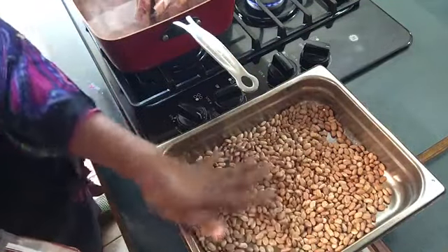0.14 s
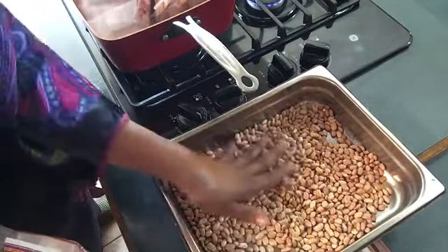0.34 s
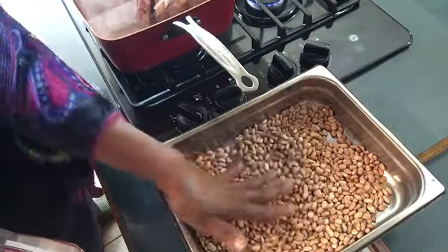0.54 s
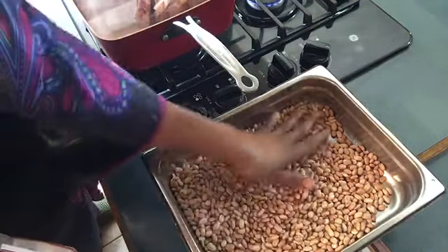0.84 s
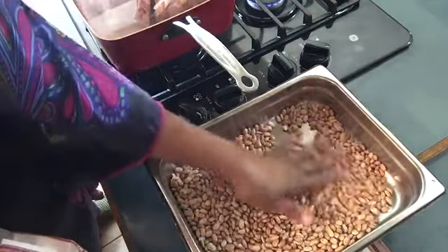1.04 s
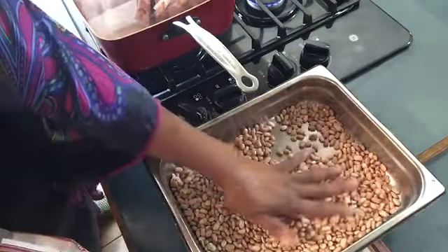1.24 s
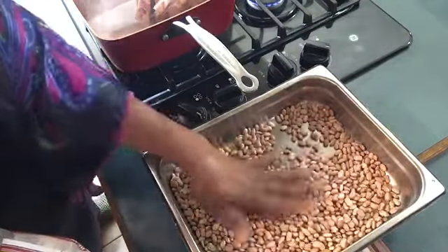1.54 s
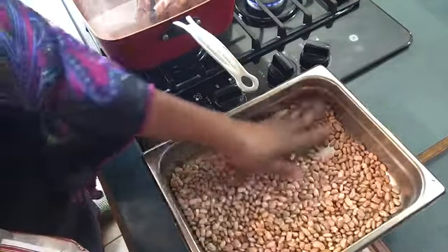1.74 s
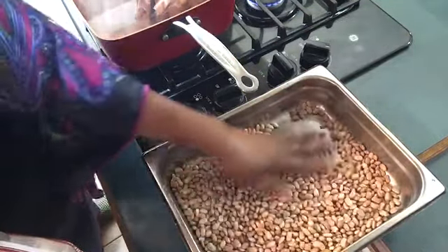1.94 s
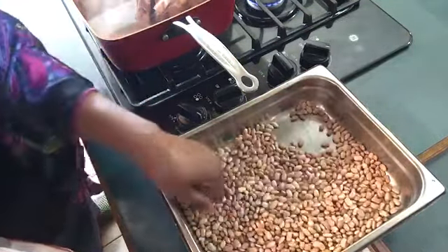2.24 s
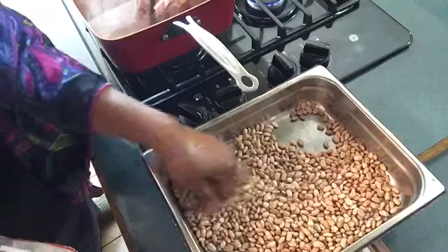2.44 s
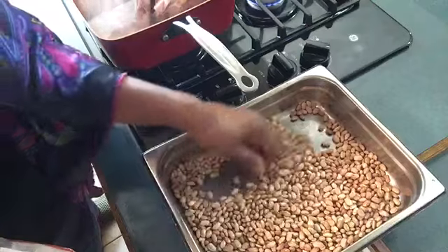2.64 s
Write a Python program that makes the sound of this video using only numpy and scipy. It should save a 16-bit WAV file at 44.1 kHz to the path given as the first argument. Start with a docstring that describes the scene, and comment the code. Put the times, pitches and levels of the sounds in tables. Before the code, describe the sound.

A hand stirs dry beans in a metal pan, clattering in four sweeps with soft thuds

```python
"""Over a faint kitchen background, a stir of dry beans in a steel pan dies away at the start.
Then a hand sweeps through them four times, landing with soft thuds, two of them in the last sweep.
The beans, random clicks, knock on the pan and tick on each other; single beans snap out throughout.
The clicks and the hand's pushes ring the pan's tones; in the last sweep beans also scrape on the steel.
All of it rings on briefly in the small room."""
import sys
import numpy as np
from scipy import signal
from scipy.fft import rfft, irfft
from scipy.io import wavfile

SR = 44100
rng = np.random.default_rng(int(sys.argv[2]) if len(sys.argv) > 2 else 0)


def persist_wave(psi):
    """Save psi, clipped to +-1, as 16-bit WAV."""
    counts = np.round(np.clip(psi, -1, 1) * 32767).astype(np.int16)
    wavfile.write(sys.argv[1], SR, np.atleast_2d(counts).T)


N = 123479
T = np.arange(N) / SR  # time of every sample in seconds

# Every T60 below is the time in which a sound falls by 60 dB.
# The first hard edge of every bean contact, against its crack; its scatter between the pan's walls
EDGE_DB, SCATTER_T60_S = -2, 0.049


def from_db(db):
    """Turn decibels into a factor for the wave's height."""
    return 10 ** (np.asarray(db) / 20)


def unit(x):
    """Scale a sound so that its squared samples add up to 1 (energy 1)."""
    return x / np.sqrt(np.sum(x ** 2) + 1e-20)


def through(x, response):
    """Let every sample of a sound set off a copy of the response, and add up the copies."""
    return signal.fftconvolve(x, response)[:N]


def colour(points, size=4096):
    """Make a short response of energy 1 with the given tone colour, starting as promptly as it can."""
    hz, db = np.transpose(points)
    f = np.maximum(np.fft.rfftfreq(size, 1 / SR), 1)
    curve_db = np.interp(np.log(f), np.log(hz), db)
    # Folding the cepstrum moves the whole response after time zero (minimum phase)
    cepstrum = irfft(np.log(from_db(curve_db)))
    cepstrum[1:size // 2] *= 2
    cepstrum[size // 2 + 1:] = 0
    return unit(irfft(np.exp(rfft(cepstrum))))


def burst(t60, size=4096):
    """Make noise of energy 1 that dies away steadily."""
    fade = from_db(-60 * T[:size] / t60)
    return unit(rng.standard_normal(size) * fade)


def resonance(x, hz, t60):
    """Ring one mode, a tone that an object sounds when struck; the gain at its pitch is 1."""
    r = from_db(-60 / (t60 * SR))  # what is left of the ring after one sample
    top = np.array([1, 0, -1]) * (1 - r * r) / 2
    return signal.lfilter(top, [1, -2 * r * np.cos(2 * np.pi * hz / SR), r * r], x + 1e-18)


def sinking(force, hz, t60):
    """Ring one mode whose pitch moves while it rings."""
    turn = np.exp(2j * np.pi * np.cumsum(hz) / SR)
    decay = from_db(-60 / (t60 * SR))
    return np.real(turn * signal.lfilter([1], [1, -decay], force / turn + 1e-18))


def background():
    """Steady noise, coloured like the faint background of a kitchen."""
    # Colour of the background: (f/Hz, level/dB)
    floor_colour = [(20, -27), (42, 2), (60, -1.5), (400, -5), (1500, -4.5), (5000, -10), (16000, -34)]
    return from_db(-57.5) * through(rng.standard_normal(N), colour(floor_colour))


def contact(t60, scatter_db):
    """One contact: a sharp edge, then a crack and its scatter in the pan, drawn anew each time."""
    crack = unit(burst(t60) + from_db(scatter_db) * burst(SCATTER_T60_S))
    return unit(np.concatenate([[from_db(EDGE_DB)], crack]))


def rattle(level_db, per_s, spread_db, pitch_hz, count=24):
    """Random contacts at many spots that ring briefly; harder stirring makes them denser and stronger."""
    busy_db, rate_follows = -32, 0.7  # level at which per_s holds; how strongly the rate follows the level
    crack_t60_s, scatter_db = 0.012, -0.5
    ring_cycles, ring_db = 17.5, -6  # swings in which the ring falls by 60 dB; its strength
    chance = np.minimum(per_s * from_db(rate_follows * (level_db - busy_db)) / SR, 1)
    sizes = from_db(spread_db * np.minimum(rng.exponential(1, N), 2.7))
    # Divide by the expected power, so that the level stays as asked at any rate
    power = np.mean(sizes ** 2) * chance
    clicks = (rng.random(N) < chance) * sizes / np.sqrt(power) * from_db(level_db)
    spot = rng.integers(0, count, N)
    out = np.zeros(N)
    for k, hz in enumerate(np.geomspace(*pitch_hz, count)):
        crack = contact(crack_t60_s, scatter_db)
        ring = unit(resonance(crack, hz, ring_cycles / hz))
        out += through(clicks * (spot == k), unit(crack + from_db(ring_db) * ring))
    return out


def snaps():
    """Lone hard contacts, an edge and a crack: knocks that ring at their own pitch, and ticks."""
    # Single beans that snap out: (t/s, knock level/dB, tick level/dB, knock f/Hz)
    snap_events = [(0.0784, -4.5, -33, 1460), (0.1052, -6, -7.5, 1560), (0.1278, -4.5, -6.5, 4460),
                   (0.1863, -8, -3.5, 2390), (.398, -2, -3, 3570), (.64, -10, -19, 2470),
                   (0.712, -17, -28, 1680), (0.891, 8, 8, 3040), (0.9195, 5, 3.5, 2600),
                   (1.03, -1, -7, 2860), (1.074, 3, -6, 1700), (1.108, -12, -19, 2870),
                   (1.126, -3, 1.5, 3080), (1.219, -7, -3, 2850), (1.5414, 0, -1.5, 1930),
                   (1.5625, -9, -16, 2820), (1.699, 8, -26, 1760), (1.7133, -3, -11, 2770),
                   (1.7381, -0.5, -6, 2760), (1.758, 1, -9, 2780), (1.8171, 4.5, 13, 2780),
                   (1.913, 6, 2.5, 2980), (2.165, -15, -42, 1370), (2.1976, -2.5, -18, 3850),
                   (2.2134, 0, -7, 4180), (2.297, -1.5, -3.5, 4070), (2.37, -2, -3, 3500),
                   (2.386, 8.5, 9, 4000), (2.4289, 3, 1, 3400), (2.447, 7.5, 4, 2690),
                   (2.513, 4, -18, 1930), (2.6913, 1.5, 3, 1700)]
    snap_db, crack_t60_s, scatter_db = -12.5, 0.0099, 4
    ring_cycles, ring_db = 24.7, -7.5  # ring of the spot that the bean strikes
    out = np.zeros((2, N + SR))
    for s, knock_db, tick_db, hz in snap_events:
        snap = contact(crack_t60_s, scatter_db)
        ring = unit(resonance(signal.unit_impulse(len(snap)), hz, ring_cycles / hz))
        knock = unit(snap + from_db(ring_db) * ring)
        start = int(s * SR)
        out[:, start:start + len(snap)] += [from_db(knock_db) * knock, from_db(tick_db) * snap]
    return from_db(snap_db) * out[:, :N]


def beans():
    """Dull knocks on the pan, bright ticks of bean on bean and lone snaps, which also ring the steel."""
    # Stirring, one list per sweep: (t/s, knocking level/dB, ticking level against the knocking/dB)
    sweeps = [
        [(0, -33.5, -9), (.02, -42, -15.5), (.055, -53.5, -12)],
        [(.168, -49.5, -9), (.208, -32.5, -19), (.285, -38, -11.5), (.35, -30, -8), (.403, -28.5, 1.5),
         (.47, -31, -11), (.55, -42, -7), (.595, -51.5, -10.5)],
        [(.737, -62, -26), (.745, -30.5, -7.5), (.776, -32, -12.5), (.815, -44.5, -24), (.855, -35.5, -18),
         (.887, -29.5, -8.5), (.96, -29, -6.5), (1.11, -35, -9), (1.25, -35.5, -11), (1.35, -33, -10.5),
         (1.555, -43, -5), (1.615, -62, -14)],
        [(1.688, -41.5, -15), (1.703, -33.5, -23), (1.795, -36, -6), (1.85, -32.5, -0.5), (1.925, -27, -9.5),
         (2.0, -33, -8.5), (2.05, -41, -22.5), (2.11, -40, -34), (2.185, -51.5, -43)],
        [(2.207, -40, -17), (2.214, -33.5, -4.5), (2.244, -39, 3), (2.272, -53, -8), (2.33, -39, -1),
         (2.385, -28.5, 1.5), (2.418, -32.5, -5.5), (2.52, -27.5, -9), (2.65, -31.5, -6.5), (2.8, -38, -18)],
    ]
    # Colour of a bean knocking on the pan: (f/Hz, level/dB)
    knock_colour = [(20, -31), (200, -26), (310, -5), (400, -12.5), (600, -1), (1000, -5), (1500, -2.5),
                    (2200, -0.5), (2900, 4.5), (3500, -1.5), (4300, 0), (4900, -8.5), (6200, -7.5),
                    (8000, -15.5), (16000, -34)]
    # Colour of a bean ticking on a bean: (f/Hz, level/dB)
    tick_colour = [(300, -18.5), (1500, -5), (4000, 7), (4900, 0), (6600, 0.5), (8000, -8), (10500, -11.5),
                   (12700, -10), (16000, -17)]
    # Colour of the hard tick of a snapping bean: (f/Hz, level/dB)
    snap_tick_colour = [(500, -80), (4800, -9), (6600, 19), (9000, 10.5), (13000, 11), (16000, 4)]
    # Higher modes of the loaded pan, rung by the beans: (f/Hz, level/dB, time to fall by 60 dB/s)
    pan_high = [(1022, 2, 0.043), (1325, -1, .075), (1621, -1.5, 0.018), (1838, -6, 0.046),
                (1923, -6, 0.038), (3180, -11, 0.17), (5410, -4.5, 0.012)]

    s, stir_db, bright_db = np.transpose([row for sweep in sweeps for row in sweep])
    stir_db, bright_db = np.interp(T, s, stir_db), np.interp(T, s, bright_db)
    snap_knocks, snap_ticks = snaps()
    # pitch_hz is the range in which the single contacts ring
    knocks = from_db(-4) * rattle(stir_db, per_s=900, spread_db=0.5, pitch_hz=(1136, 4510))
    ticks = from_db(2 + bright_db) * rattle(stir_db, per_s=700, spread_db=3, pitch_hz=(3370, 14100))
    hits = through(knocks + snap_knocks, colour(knock_colour))
    hits += through(ticks, colour(tick_colour))
    hits += through(snap_ticks, colour(snap_tick_colour))
    return hits + sum(from_db(db) * resonance(hits, hz, t60) for hz, db, t60 in pan_high)


def hand():
    """The palm's blow rings the pan's low modes; its ever softer pushes make a dull, sinking thud."""
    # The hand lands on the beans: (t/s, level/dB, thud level against it/dB)
    landings = [(.204, -2, 2), (.769, 2, 0.5), (1.756, -0.5, 4), (2.21, -6.5, -15), (2.348, -8, 3)]
    # Low modes of the loaded pan: (f/Hz, level under the hand/dB, time to fall by 60 dB/s)
    pan_low = [(303, -15.5, 0.18), (328, -11.5, 0.45), (430, -20.5, 0.12), (597, -8.5, 0.12),
               (670, -10, 0.18), (1057, -3.5, 0.059)]
    rise_s, blow_fall_s, contacts_per_s, blow_db = 0.001, 0.01, 3000, -4.5
    # The thud sinks in pitch as the palm weighs on the pan
    high_hz, low_hz, sink_s = 344, 132, 0.019
    thud_t60_s, thud_fall_s, thud_level_db = 0.027, 0.068, -7
    out = np.zeros(N)
    for s, db, thud_db in landings:
        age = np.maximum(T - s, 0)
        touched = rng.random(N) < contacts_per_s / SR
        pushes = rng.standard_normal(N) * touched * (1 - np.exp(-age / rise_s))
        blow = pushes * np.exp(-age / blow_fall_s)
        modes = np.zeros(N)
        for k, (hz, mode_db, t60) in enumerate(pan_low):
            # Every second mode swings the opposite way
            modes += (-1) ** k * from_db(mode_db) * unit(resonance(blow, hz, t60))
        pitch = low_hz + (high_hz - low_hz) * np.exp(-age / sink_s)
        thud = unit(sinking(pushes * np.exp(-age / thud_fall_s), pitch, thud_t60_s))
        out += from_db(db) * (from_db(blow_db) * modes + from_db(thud_level_db + thud_db) * thud)
    return out


def rub():
    """As the fingers close, beans scrape along the steel: a rough tone that swells and lets go."""
    start_s, end_s = 2.213, 2.37
    progress = np.clip((T - start_s) / (end_s - start_s), 0, 1)
    swell = np.sin(np.pi * progress ** 2)
    tone = resonance(rng.standard_normal(N), hz=1341, t60=0.09)
    return from_db(-44) * swell * tone / np.std(tone)


def kitchen(x):
    """Sound thrown back by the nearby walls: a short blurred tail, duller than the direct sound."""
    room_t60_s, room_db = 0.19, -8.5
    late = T[:SR // 2] > 0.005  # the tail sets in 5 ms after the direct sound
    tail = burst(room_t60_s, size=SR // 2) * late
    dull = signal.butter(1, 7000, fs=SR, output="sos")
    return from_db(room_db) * through(x, signal.sosfilt(dull, tail))


def scene():
    """Beans, hand and scraping in the room, over its faint background."""
    pan = beans() + hand() + rub()
    return (pan + kitchen(pan) + background())[None]


def record(dry):
    """Cut the treble steeply above 16.1 kHz."""
    low_pass = signal.ellip(10, 0.2, 75, 16100, fs=SR, output="sos")
    return signal.sosfilt(low_pass, dry)


dry = scene()
out = record(dry)
persist_wave(out)
```